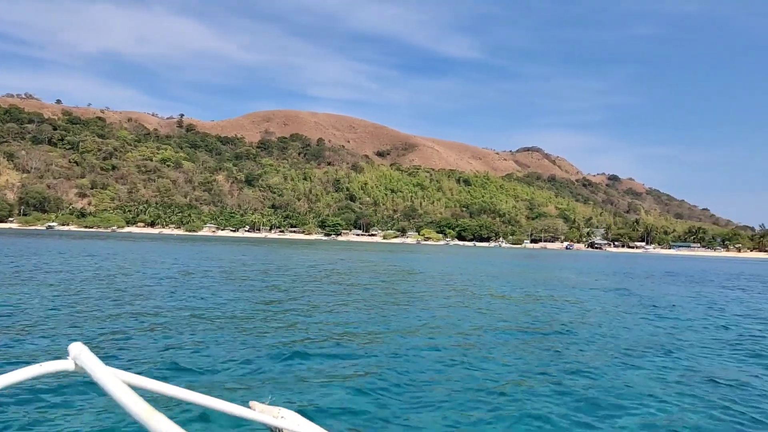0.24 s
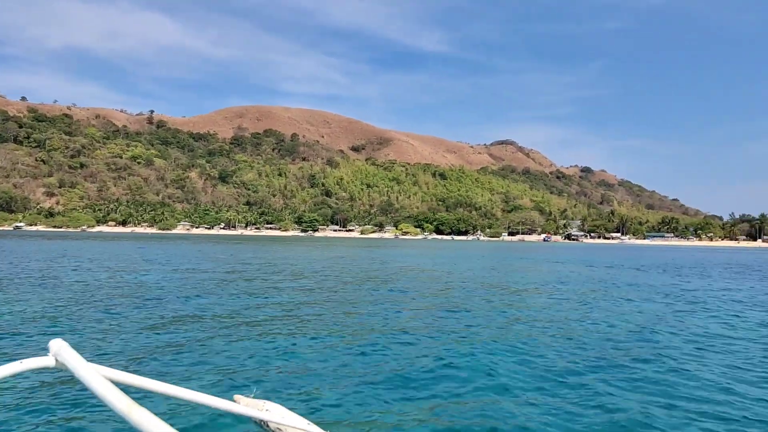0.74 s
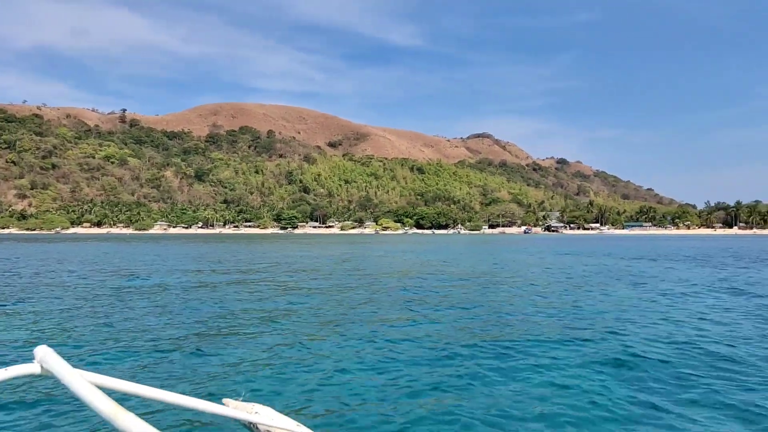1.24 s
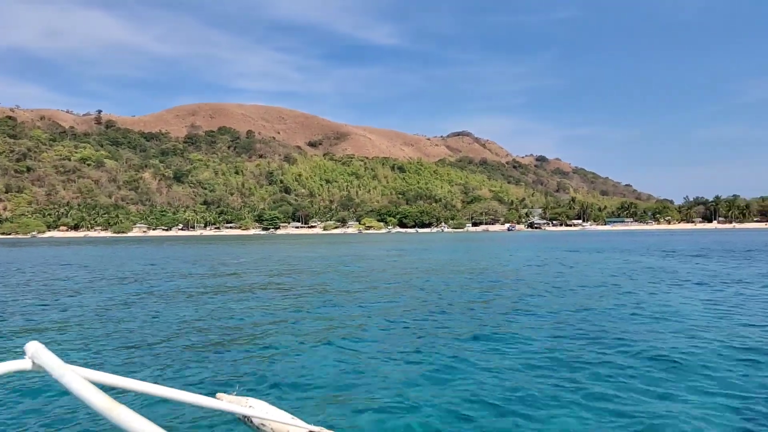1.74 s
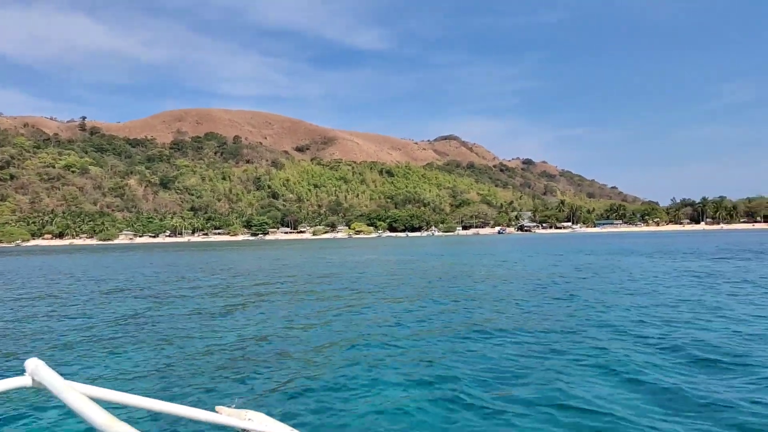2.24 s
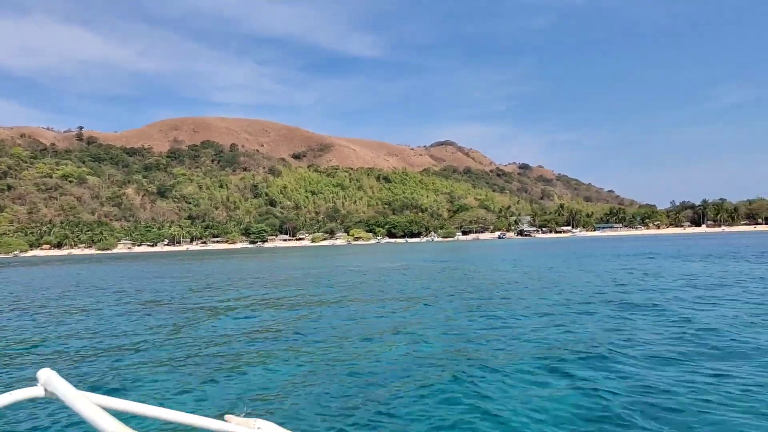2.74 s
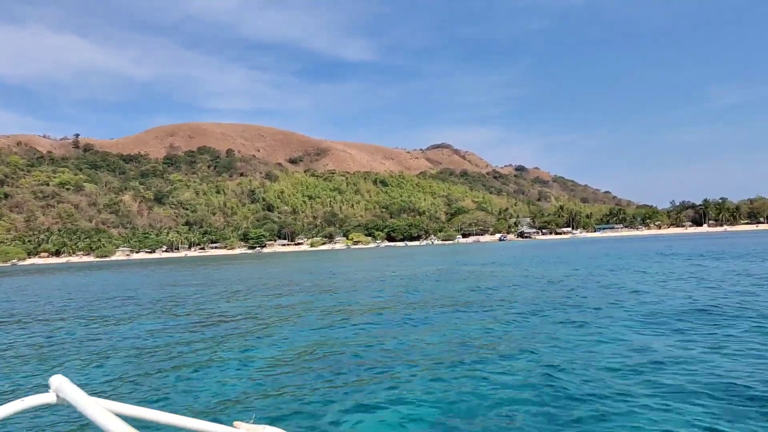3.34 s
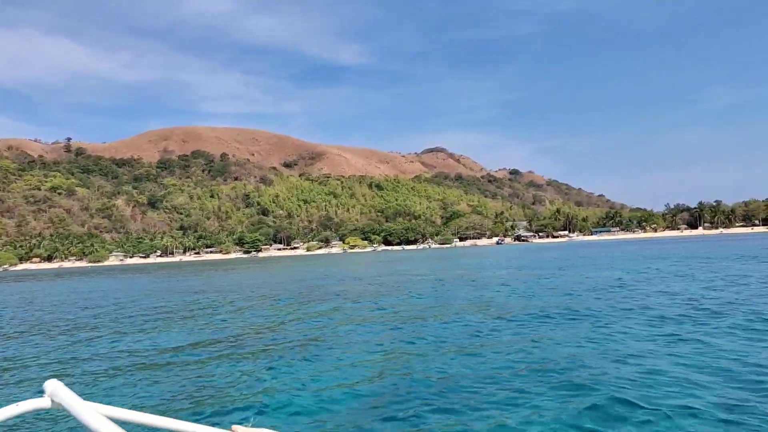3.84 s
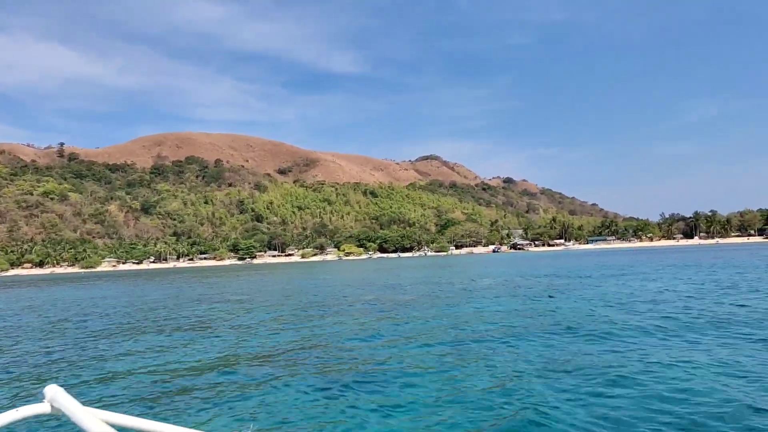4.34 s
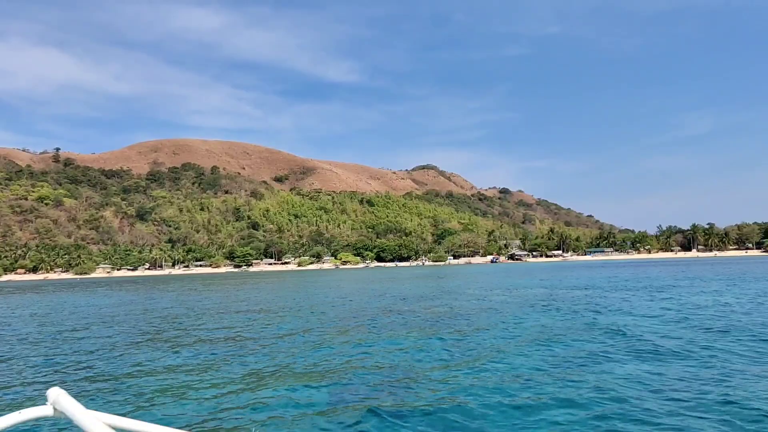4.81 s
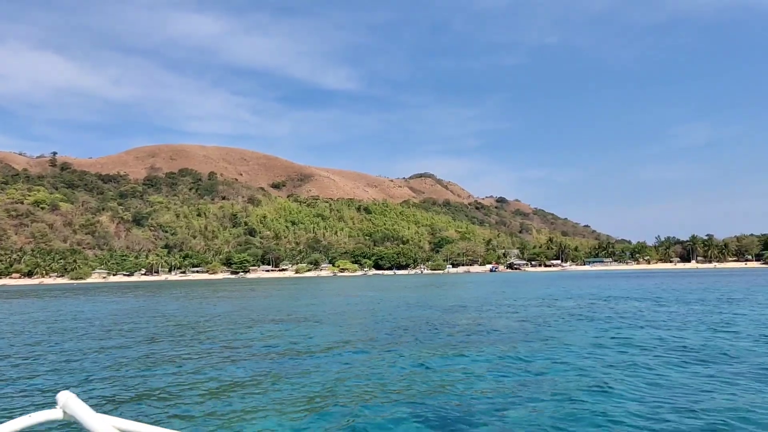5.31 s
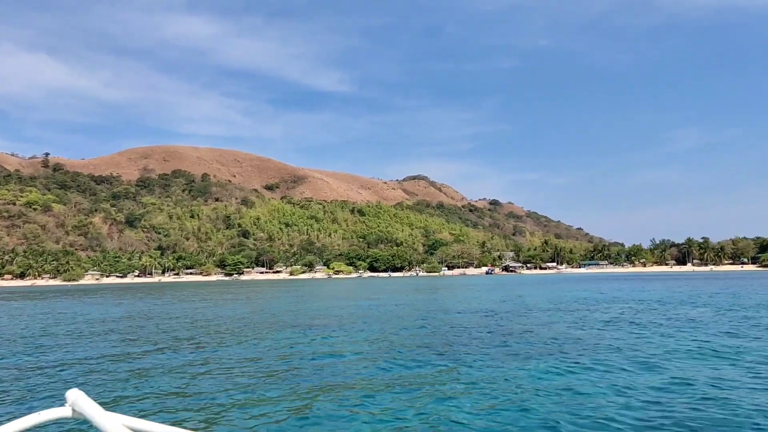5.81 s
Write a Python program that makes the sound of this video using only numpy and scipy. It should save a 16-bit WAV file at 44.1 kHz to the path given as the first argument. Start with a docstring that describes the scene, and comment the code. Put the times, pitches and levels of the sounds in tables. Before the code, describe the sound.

A small single-cylinder boat engine chugs fast and steadily up close, with booming exhaust, raspy gas and metallic clatter, slowing slightly twice over faint water wash.

```python
"""Aboard an outrigger boat on open water, its single-cylinder four-stroke engine chugs close to the microphones.
Easing the throttle twice slows it a little: firing pulses boom through pipe resonances and jolt hull and deck
into ringing and droning, while shaped noise bursts make each bark, spit, rasp of gas and clatter of metal.
Filtered noise washes along the hull and puffs as a light headwind; two microphone ports colour the treble."""
import sys
import numpy as np
from scipy import signal
from scipy.fft import rfft, irfft, next_fast_len
from scipy.io import wavfile
from scipy.ndimage import uniform_filter1d, map_coordinates

SR = 44100
rng = np.random.default_rng(int(sys.argv[2]) if len(sys.argv) > 2 else 0)


def int16_out(signal):
    """Quantize to a 16-bit WAV file."""
    q = np.round(np.clip(np.atleast_2d(signal).T, -1, 1) * 32767)
    wavfile.write(sys.argv[1], SR, q.astype(np.int16))


N = 267687  # samples

# ringing of the engine block and covers: (centre [Hz], width [Hz], lift [dB])
BLOCK_MODES = [(660, 70, 2), (920, 290, 4.5), (1340, 90, 2), (1900, 300, 4), (2170, 130, 3),
               (3080, 160, 3.5), (4460, 130, 4)]
DECK_DELAY_S = 0.00853  # from the firing to the jolt of the deck


def amp(db):
    """Decibels to gain."""
    return 10 ** (np.asarray(db) / 20)


def unit(x):
    """x at rms 1."""
    return x / np.sqrt(np.mean(x ** 2) + 1e-20)


def along(points, hz):
    """Points of (frequency [Hz], value), read on a log frequency axis."""
    f, v = np.transpose(points)
    return np.interp(np.log(hz + 1), np.log(f + 1), v)


def curve(points):
    """Points of (time [s], value), read at every sample."""
    return np.interp(np.arange(N) / SR, *np.transpose(points))


def wobble(rate):
    """A smooth random curve with this many knots a second."""
    knots = rng.standard_normal(int(N * rate / SR) + 4)
    return map_coordinates(knots, [np.arange(N) * rate / SR])


def bell(hz, centre, width):
    """The shape of one resonance, 1 at its centre."""
    return 1 / (1 + (2 * (hz - centre) / width) ** 2)


def bumps(peaks, hz):
    """Gain of a flat response that resonances lift by so many dB."""
    return amp(sum(db * bell(hz, centre, width) for centre, width, db in peaks))


def resonances(peaks, hz):
    """Gain of a body that passes only its resonances."""
    return sum(amp(db) * bell(hz, centre, width) for centre, width, db in peaks)


def filtered(x, response):
    """x passed through a complex response of frequency."""
    m = 2 * next_fast_len(N // 2 + SR // 4)
    return irfft(rfft(x, m) * response(np.fft.rfftfreq(m, 1 / SR)), m)[..., :N]


def causal(gain):
    """The minimum-phase response with this gain, which rings only after it is struck."""
    cepstrum = irfft(np.log(gain + 1e-6))
    half = len(cepstrum) // 2
    folded = np.r_[cepstrum[0], 2 * cepstrum[1:half], np.zeros(half)]
    return np.exp(rfft(folded))


def noise(colour):
    """Stereo noise of rms 1, partly alike in the low mids and unrelated at the top of the treble."""
    # likeness of the two microphones: (frequency [Hz], coherence [0-1])
    likeness = [(60, 0.046), (300, 0.46), (630, 0.34), (1370, 0.21), (3000, 0.12), (14000, 0)]
    turn = lambda hz: np.arccos(np.clip(along(likeness, hz), -1, 1)) / 2
    shares = lambda hz: colour(hz) * [np.cos(turn(hz)), np.sin(turn(hz))]
    mid, side = filtered(rng.standard_normal((2, N)), shares)
    return unit(np.array([mid + side, mid - side]))


def patchy(x, depth_db):
    """Random patches over time and frequency make the noise's colour uneven."""
    spectrum = signal.stft(x, nperseg=512)[2]
    field = rng.standard_normal(spectrum.shape[1:])
    for axis in (0, 1):  # patches spread over frequency, then over time
        field = uniform_filter1d(field, size=6, axis=axis)
    coloured = spectrum * amp(depth_db * unit(field))
    return unit(signal.istft(coloured, nperseg=512)[1][:, :N])


def slowing():
    """Firings per second lost so far: after each easing the flywheel runs down towards its new speed."""
    # easings of the throttle: (time [s], speed lost [firings/s], settling time [s])
    easings = [(1.169, .4903, .5355), (4.409, .5105, .893)]
    t = np.arange(N) / SR
    return sum(lost * (1 - np.exp(-np.maximum(t - s, 0) / settle)) for s, lost, settle in easings)


def firings(rate):
    """Engine cycles done, and the samples at which the exhaust valve opens, once in two turns of the crank."""
    first_firing_s = .0244
    cycle = np.cumsum(rate) / SR
    cycle = cycle - np.interp(first_firing_s * SR, np.arange(N), cycle)
    return cycle, np.searchsorted(cycle, np.arange(int(cycle[-1]) + 1))


def later(at, delay):
    """The firing samples, so many seconds later."""
    return np.maximum(at + int(round(delay * SR)), 0)


def pulses(at, scatter_db):
    """One impulse a firing, each of its own size."""
    return np.bincount(at, amp(scatter_db * rng.standard_normal(len(at))), N)[:N]


def bursts(at, rise, decay, rest, scatter_db):
    """An envelope of rms 1 that jumps at each firing and sinks back to a resting share."""
    t = np.arange(SR // 6) / SR
    shape = (1 - np.exp(-t / rise)) * np.exp(-t / decay)
    return unit(rest + signal.fftconvolve(pulses(at, scatter_db), shape)[:N])


def cracks(column):
    """The extra jump and decay of the hard firings, for one column of their levels."""
    # firings that crack harder than the rest: (time [s], relative hiss level [dB], relative rattle level [dB])
    hard_firings = [(1.403, -17, -22), (1.569, -9, -25), (1.848, -4, -23), (2.129, -3, -15),
                    (2.246, -1, -3), (2.354, -13, -4), (2.645, -7, 0), (2.81, -9, -9), (3.03, -4, -3),
                    (3.26, -12, 1), (3.538, -7, -2), (4.159, -8, -9), (4.216, -12, -2), (4.33, -14, -15),
                    (5.016, -12, -2), (5.818, -18, -7)]
    rise_s, decay_s = .002, 0.039
    since = lambda s: np.maximum(np.arange(N) / SR - s, 0)
    shape = lambda t: (1 - np.exp(-t / rise_s)) * np.exp(-t / decay_s)
    return sum(amp(row[column]) * shape(since(row[0])) for row in hard_firings)


def jolts(at, delay):
    """Blows that reach a panel after each firing, a little uneven in strength and timing."""
    jitter_s = .00007
    slip = np.round(jitter_s * SR * rng.standard_normal(len(at))).astype(int)
    return pulses(later(at + slip, delay), scatter_db=1.0)


def panel(blows, hz, rise, decay):
    """A wooden panel swells and dies away at its own pitch after each blow; rms 1."""
    t = np.arange(SR // 3) / SR
    ring = np.sin(2 * np.pi * hz * t) * (1 - np.exp(-t / rise)) ** 2 * np.exp(-t / decay)
    return unit(signal.fftconvolve(blows, ring)[:N])


def wind():
    """A light headwind puffs as low rumble, gusting at each microphone port on its own."""
    gusts = amp(4 * np.array([wobble(6), wobble(7)]))
    return amp(-46) * unit(gusts * noise(lambda hz: bell(hz, 32, 40)))


def water():
    """The wash along the hull is coloured noise whose level flutters by a few dB."""
    # colour of the wash: (frequency [Hz], relative level [dB])
    wash = [(15, -19), (40, 3), (65, 4), (100, 10), (200, 4), (400, -6), (1000, -8.5), (3500, -27.5),
            (9000, -13), (15000, -25)]
    swell_db = 2.2 * wobble(20)
    return amp(-28.5 + swell_db) * noise(lambda hz: amp(along(wash, hz)))


def deck_rings(at):
    """Each slap also sets the deck's faint upper modes humming."""
    # upper rings of the deck: (centre [Hz], width [Hz], relative level [dB])
    rings = [(546, 14, -6), (568, 10, -6), (636, 8, -1.5), (656, 8, -2), (693, 12, -3.5), (782, 12, -4.5),
             (832, 12, -5.5), (938, 16, -6), (1114, 30, -9)]
    hum = filtered(jolts(at, DECK_DELAY_S), lambda hz: causal(resonances(rings, hz)))
    return amp(-43) * unit(hum)


def deck(cycle, at):
    """A loose board is slapped once a cycle and drones at a multiple of the firing rate, swelling or faltering."""
    # the deck's drone, which comes up after the first easing: (time [s], level [dB])
    drone_level = [(0, -48), (1.3, -53), (1.55, -37.5), (1.85, -35), (2.7, -36.5), (4.3, -36),
                   (6.07, -34.5)]
    # firings after which slap and drone swell or falter: (time [s], change [dB])
    surges = [(.355, -3), (.74, 5), (1.015, -6), (1.85, 2.5), (2.245, -2), (2.805, -4), (2.865, -4),
              (2.975, 3), (3.37, -7), (3.54, 4), (3.595, -8), (3.88, -12), (4.16, 1), (4.33, -7),
              (4.445, -6), (4.675, -4), (5.015, -14), (5.53, -5), (5.705, -4)]
    surge_delay_s, surge_width_s = 0.015, 0.032
    slap_hz, drone_order = 428.8, 24  # the order counts drone periods per firing
    t = np.arange(N) / SR
    slap = amp(-38.5) * panel(jolts(at, DECK_DELAY_S), slap_hz, rise=0.0048, decay=0.0098)
    waver = .2 * wobble(16)  # radians
    swell_db = .5 * wobble(18)
    drone = unit(np.sin(2 * np.pi * (drone_order * cycle - slap_hz * DECK_DELAY_S) + waver))
    surge_db = sum(db * np.exp(-((t - s - surge_delay_s) / surge_width_s) ** 2) for s, db in surges)
    return amp(surge_db + swell_db) * (slap + amp(curve(drone_level)) * drone)


def hull(at, level_db):
    """Each firing jolts the planks one way and then the other; they ring over one lingering drone."""
    # resonances of the planks: (centre [Hz], width [Hz], relative level [dB])
    plank_modes = [(242, 4.7, -45), (270.8, 16, -35.5), (283.7, 25.6, -36), (315.4, 23, -34.5),
                   (338.8, 12, -38), (365, 11, -41.5), (392, 11.6, -48)]
    # the lingering drone, which grows as the engine slows: (time [s], level [dB])
    drone_level = [(0, -34), (1.3, -33.5), (2.5, -31.5), (4.5, -31), (5.2, -29), (6.07, -26.5)]
    delay_s, rebound_s, rebound_share = 0.00691, .0245, .9
    blows = jolts(at, delay_s) - rebound_share * jolts(at, delay_s + rebound_s)
    planks = unit(filtered(blows, lambda hz: causal(resonances(plank_modes, hz))))
    drone = panel(blows, hz=295.03, rise=0.0046, decay=0.042)
    return amp(level_db) * planks + amp(curve(drone_level)) * drone


def knock(at, level_db, decay):
    """Every firing strikes the same dense modes of block and mounts, so their ring repeats cycle by cycle."""
    # colour of the modes before the block lifts it: (frequency [Hz], relative level [dB])
    mode_colour = [(60, -16), (230, -10), (350, -5), (500, 2), (650, 4.5), (1000, 4), (1400, 0.5),
                   (2200, -1), (3200, -4), (4500, -31), (9000, -42)]
    t = np.arange(SR // 8) / SR
    modes = noise(lambda hz: amp(along(mode_colour, hz)) * bumps(BLOCK_MODES, hz))[:, :len(t)]
    ring = modes * (1 - np.exp(-t / 0.0027)) * np.exp(-t / decay)
    struck = signal.fftconvolve(pulses(at, scatter_db=1.5)[None], ring, axes=1)[:, :N]
    return amp(level_db) * unit(struck)


def clatter(at, level_db):
    """Loose valve gear and covers rattle in a dense burst after each firing, more after a hard one."""
    # colour of the metal before the block lifts it: (frequency [Hz], relative level [dB])
    metal_colour = [(100, -54), (230, 0), (300, 8.5), (420, 1), (510, -9.5), (650, -4.5), (800, -10),
                    (1400, -7.5), (2500, -2), (3600, -8), (6000, -8.5), (10000, -15), (15000, -17.5)]
    metal = noise(lambda hz: amp(along(metal_colour, hz)) * bumps(BLOCK_MODES, hz))
    metal = patchy(metal, depth_db=2.8)
    envelope = bursts(at, rise=.012, decay=.0145, rest=.22, scatter_db=.6)
    return metal * (amp(level_db) * envelope + amp(-34) * cracks(column=2))


def rasp(at, level_db):
    """Gas tears out of the pipe in a bright blow, now and then with a harder crack."""
    # colour of the gas: (frequency [Hz], relative level [dB])
    gas_colour = [(500, -31), (2000, -7), (4000, 2), (7000, 2), (10000, 1.5), (12000, -4), (14500, -9.5)]
    blow_delay_s = 0.005  # after the valve opens
    blow = bursts(later(at, blow_delay_s), rise=.0045, decay=.02, rest=.15, scatter_db=.8)
    gas = patchy(noise(lambda hz: amp(along(gas_colour, hz))), depth_db=3.8)
    return gas * (amp(level_db) * blow + amp(-30.5) * cracks(column=1))


def spit(at):
    """The exhaust valve cracks open with a short, bright spit."""
    # colour of the spit: (frequency [Hz], relative level [dB])
    spit_colour = [(2000, -5), (5000, -3), (8000, -5), (11000, -4.5), (14500, -11)]
    envelope = bursts(later(at, .0012), rise=.0012, decay=.0016, rest=0, scatter_db=1.6)
    return amp(-42.5) * envelope * noise(lambda hz: amp(along(spit_colour, hz)))


def chuff(at):
    """Combustion barks through the cylinder wall in a short, firm puff at each firing."""
    # colour of the bark: (frequency [Hz], relative level [dB])
    bark_colour = [(200, -31), (400, 2), (510, 2), (640, 1.5), (900, -6.5), (1400, -7), (2200, -14),
                   (4000, -20)]
    lead_s = 0.0039  # the bark starts just before the valve opens
    envelope = bursts(later(at, -lead_s), rise=0.016, decay=0.0067, rest=0.047, scatter_db=4.0)
    return amp(-40) * envelope * noise(lambda hz: amp(along(bark_colour, hz)))


def chamber(hz, centre_hz, width):
    """A silencer chamber passes every pitch but holds back those near its own, which rounds the thump."""
    pole = centre_hz ** 2 - hz ** 2 + 1j * hz * width
    return pole.conj() / pole


def exhaust(cycle, at, boom_db):
    """Gas pulses and their turbulence boom in the pipe; the crank shakes the boat once a turn."""
    # resonances of the exhaust pipe: (centre [Hz], width [Hz], relative level [dB])
    pipe_modes = [(78.3, 11.7, -11.5), (92.7, 10, -14), (95.3, 42, -33), (108.9, 13.4, -20),
                  (123.13, 6.4, -18), (160.6, 13.3, -23), (177.4, 8.2, -26), (204.6, 18.8, -24)]
    boom_lead_s, shake_db = 0.00052, -13  # lead on the valve opening; shake relative to the boom
    gusts = bursts(at, rise=0.0028, decay=0.0075, rest=0.53, scatter_db=2.5)
    turbulence = noise(lambda hz: np.ones_like(hz)) * gusts
    drive = unit(pulses(later(at, -boom_lead_s), scatter_db=0.27))
    body = lambda hz: causal(resonances(pipe_modes, hz) / np.hypot(1, (hz / 900) ** 2))
    pipe = lambda hz: chamber(hz, centre_hz=227.0, width=52) * body(hz)
    muffler = lambda hz: 1 / (1 + (hz / 235) ** 8)
    boom = unit(filtered(drive + 0.045 * turbulence, lambda hz: pipe(hz) * muffler(hz)))
    shake = np.cos(2 * np.pi * 2 * cycle)  # two crank turns a cycle
    return amp(boom_db) * (boom + amp(shake_db) * shake)


def lugging(boom, lost):
    """The slower the engine turns, the stronger the deepest part of its thump."""
    deep = filtered(boom, lambda hz: bell(hz, centre=69, width=23))
    deep_db = -2.5 + 5 * lost
    return boom + (amp(deep_db) - 1) * deep


def scene():
    """Engine speed sets the rhythm and the balance of voices: slower is heavier, with less rasp."""
    cruise_hz = 18.19  # firings per second at the start
    lost = slowing()
    cycle, at = firings(cruise_hz - lost)
    # levels: dB at cruising speed, plus dB for each firing per second lost
    surroundings = water() + wind()
    boat = deck_rings(at) + deck(cycle, at) + hull(at, -33.5 + 0.5 * lost)
    block = knock(at, -41 + 3.5 * lost, decay=0.059) + clatter(at, -31.5 + 3.5 * lost)
    gas = rasp(at, -30.5 - 1.7 * lost) + spit(at)
    chug = chuff(at) + lugging(exhaust(cycle, at, -14.5 + 1.5 * lost), lost)
    return surroundings + boat + block + gas + chug


def record(dry):
    """Sound reaches the left port first; each port rings in the treble; peaks are rounded, then the top is cut."""
    # resonances of the two microphone ports: (centre [Hz], width [Hz], lift [dB])
    left_port = [(1810, 540, 5), (11370, 3630, 12)]
    right_port = [(8910, 2000, 11.94), (8870, 280, 1.9), (12600, 2500, 2.4)]
    lead_s, ceiling, top_hz = .00011, .9, 14350  # ceiling of the rounding, as a share of full scale
    lead = lambda hz: np.exp(2j * np.pi * hz * lead_s)
    response = lambda hz: np.array([bumps(left_port, hz) * lead(hz), bumps(right_port, hz)])
    ports = filtered(dry, response)
    rounded = ports / (1 + np.abs(ports / ceiling) ** 20) ** (1 / 20)
    return filtered(rounded, lambda hz: hz < top_hz)


dry = scene()
out = record(dry)
int16_out(out)
```